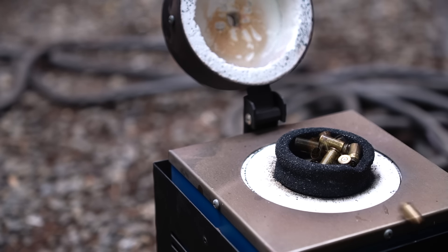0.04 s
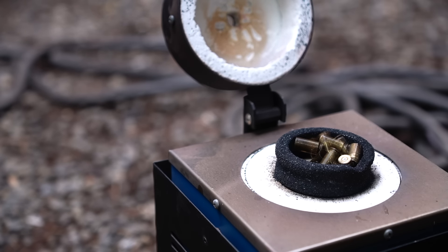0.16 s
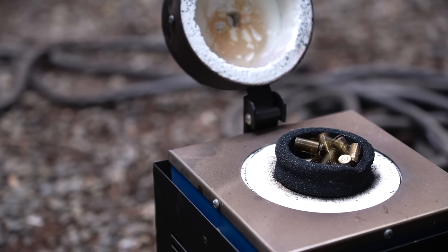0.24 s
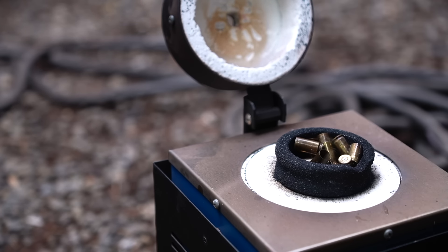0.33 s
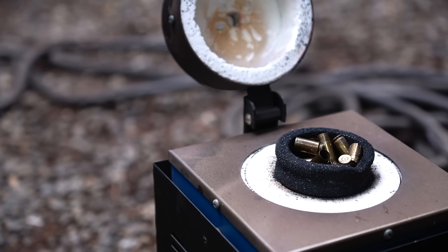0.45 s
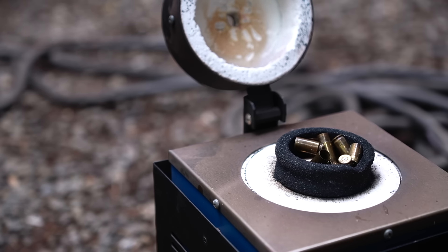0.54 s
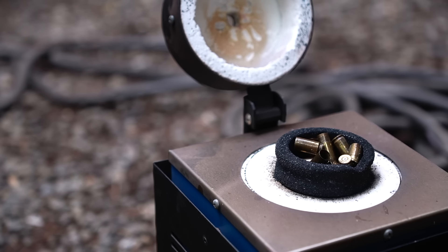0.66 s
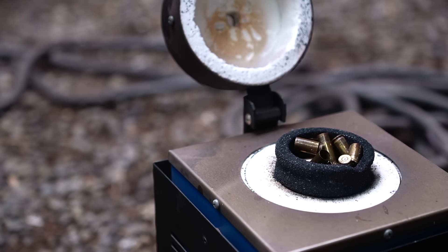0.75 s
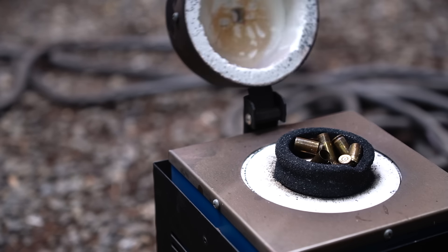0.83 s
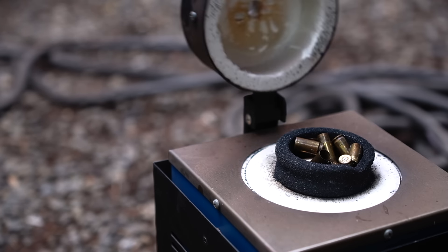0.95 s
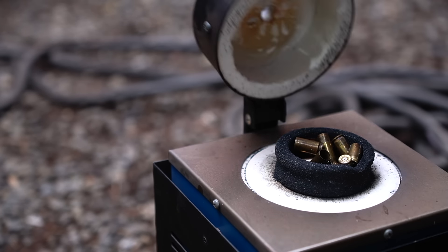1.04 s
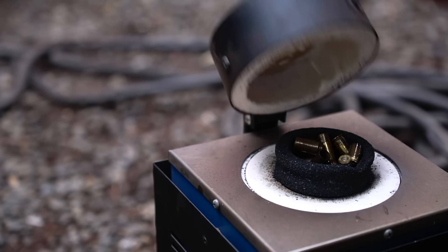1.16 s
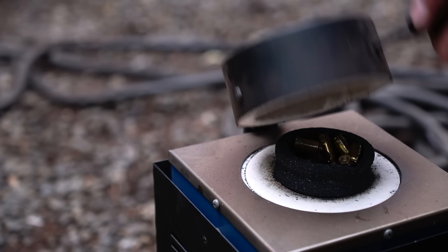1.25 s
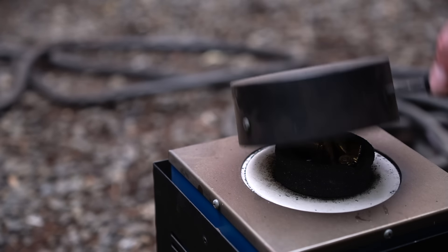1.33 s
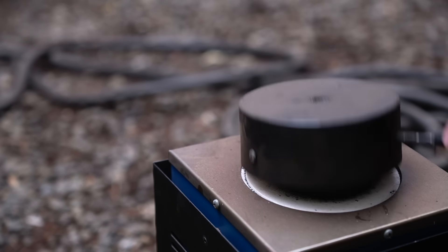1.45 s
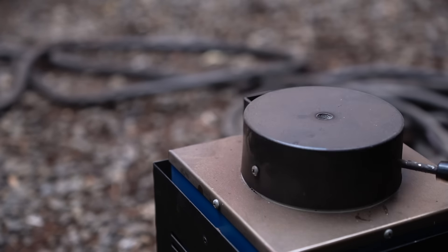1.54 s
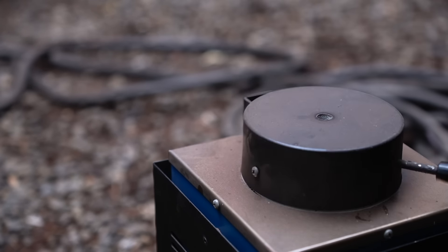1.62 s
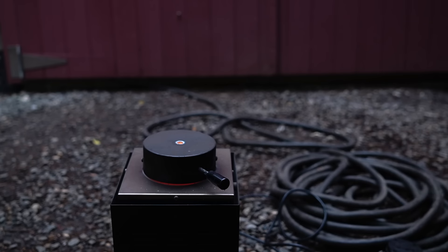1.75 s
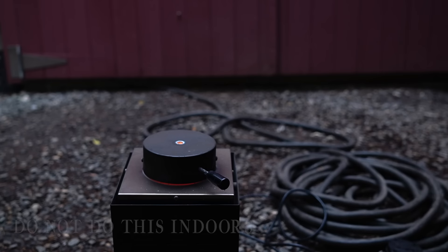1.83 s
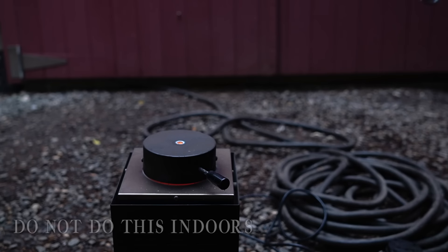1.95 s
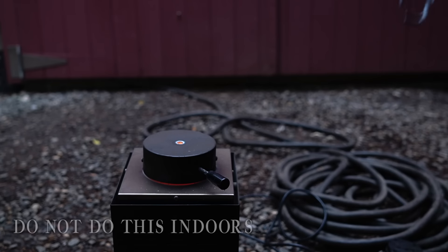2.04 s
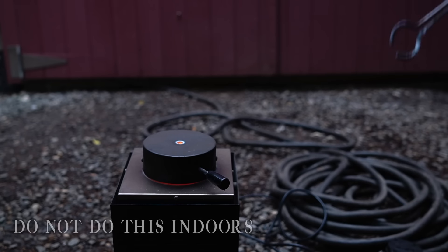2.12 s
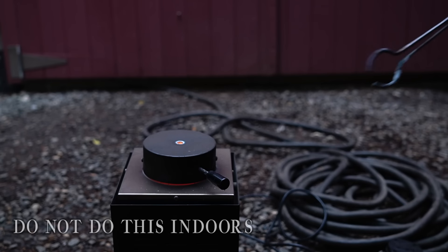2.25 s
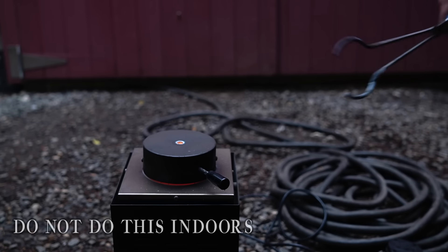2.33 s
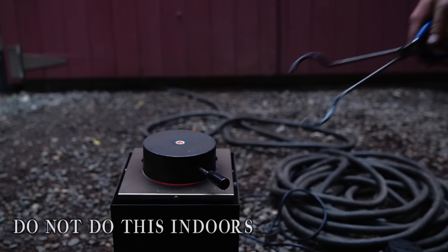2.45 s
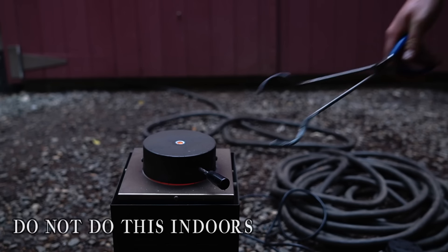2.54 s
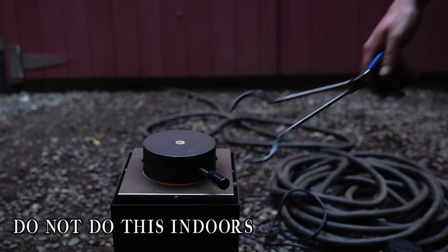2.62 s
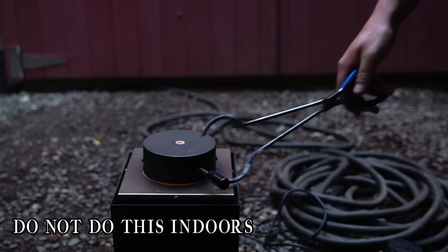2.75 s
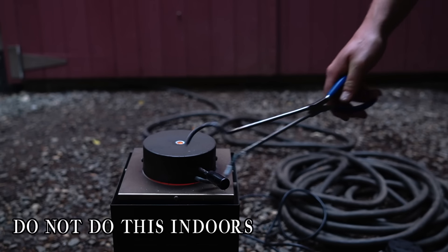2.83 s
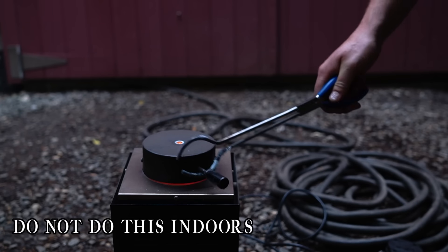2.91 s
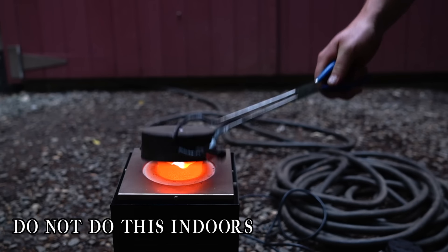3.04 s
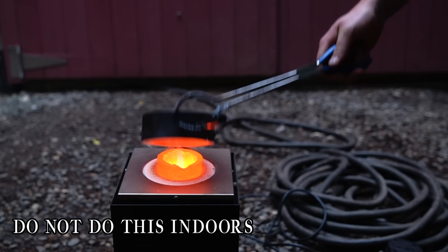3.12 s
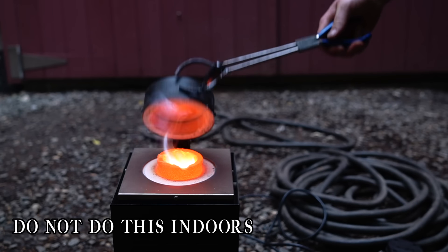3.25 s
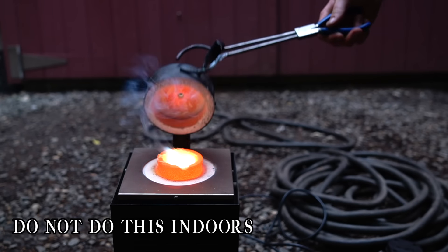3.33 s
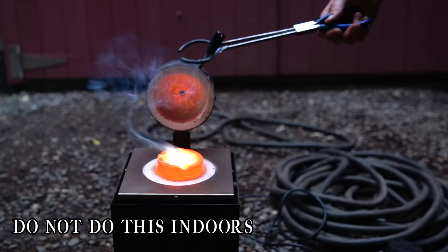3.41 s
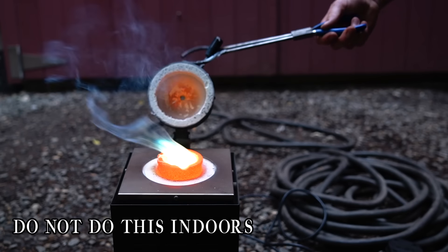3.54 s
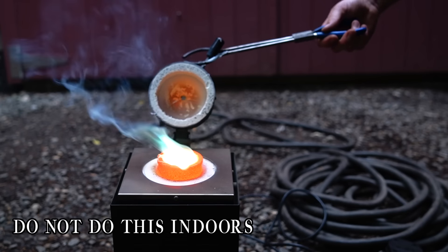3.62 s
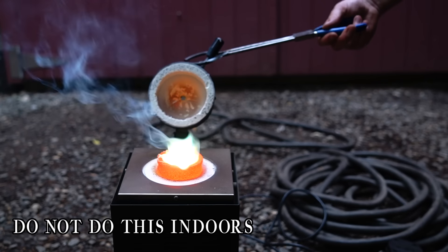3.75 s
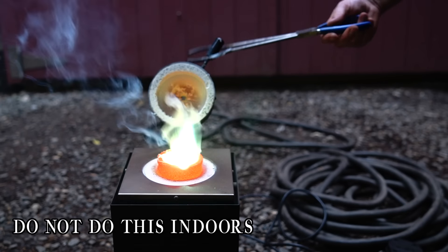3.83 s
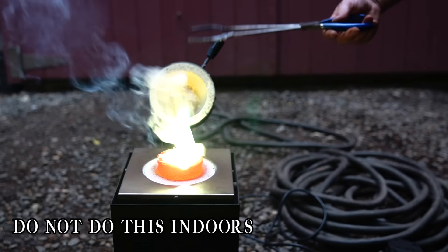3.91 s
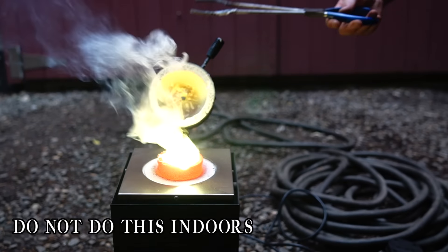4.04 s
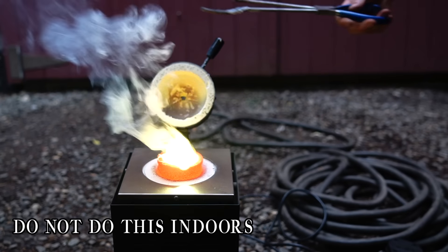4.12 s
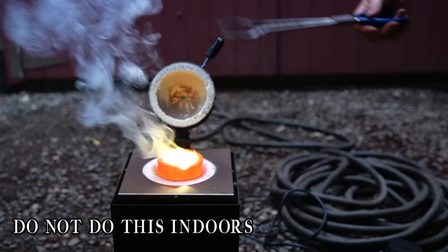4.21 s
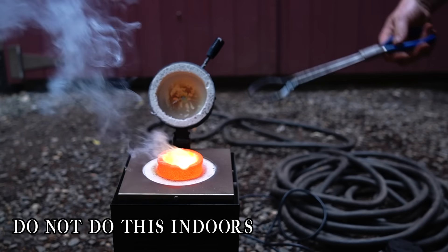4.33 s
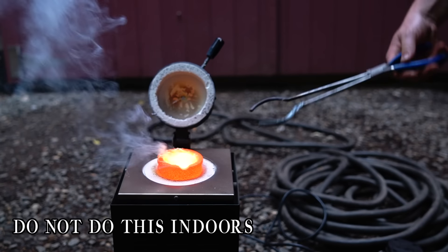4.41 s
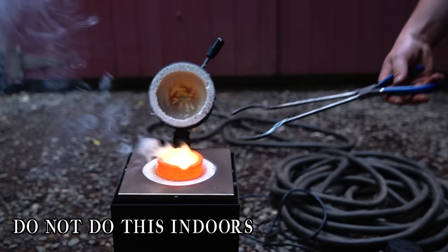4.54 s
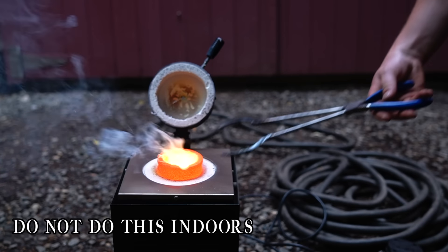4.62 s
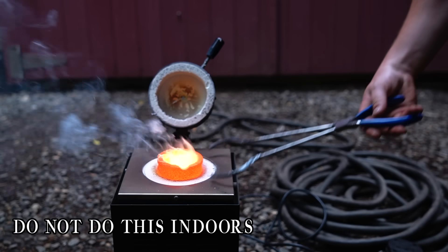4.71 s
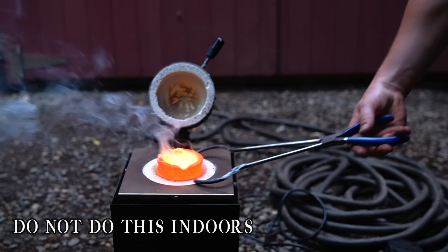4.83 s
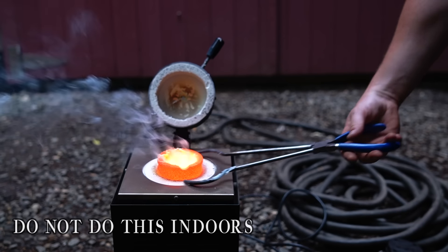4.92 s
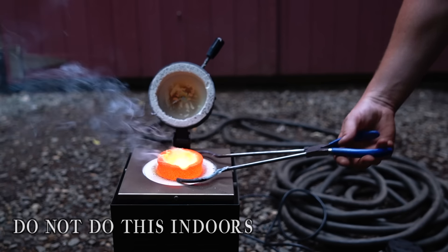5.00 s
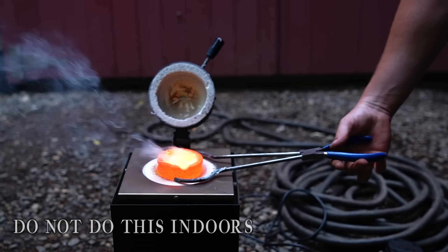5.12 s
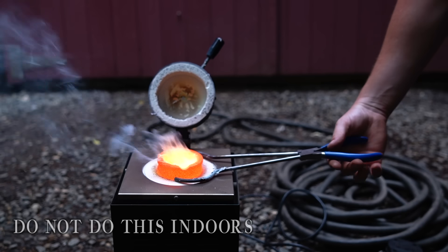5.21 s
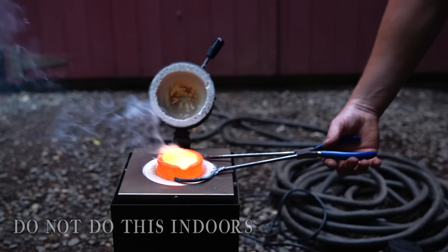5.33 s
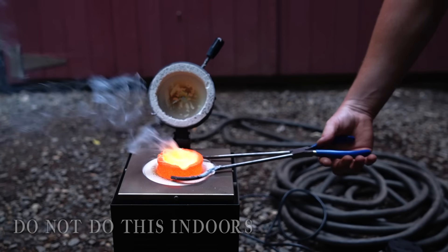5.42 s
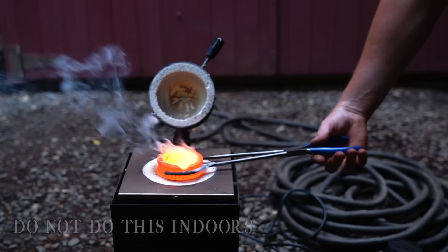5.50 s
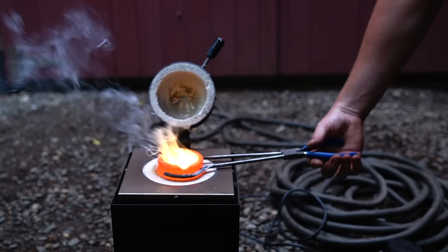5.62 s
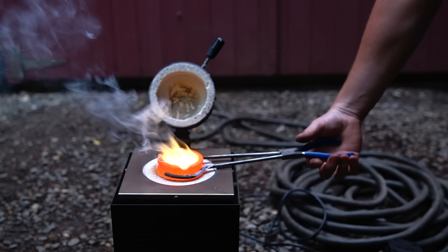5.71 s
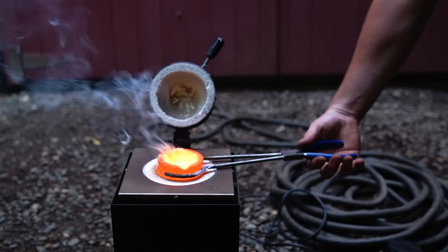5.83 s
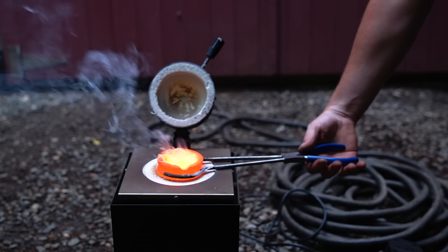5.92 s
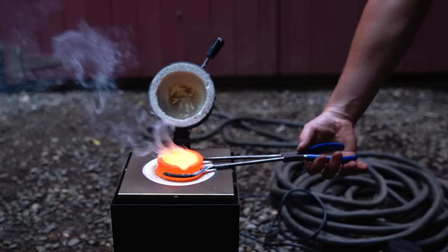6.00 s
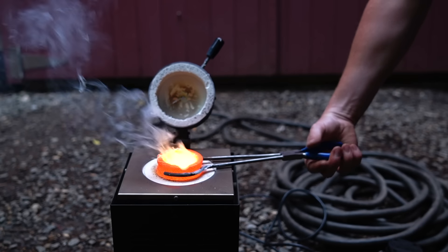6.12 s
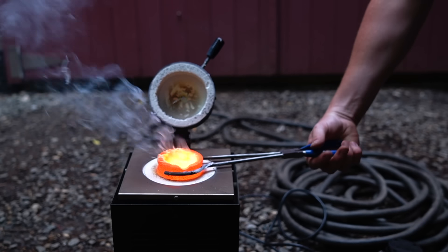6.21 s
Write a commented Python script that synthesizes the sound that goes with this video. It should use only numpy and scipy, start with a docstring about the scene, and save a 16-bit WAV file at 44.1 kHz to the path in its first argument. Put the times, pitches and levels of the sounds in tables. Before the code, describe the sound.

Outdoors, small brass tinkles to rest, a lid drops, gravel crunches faintly, and tongs strike sharply before clacking and scraping on a crucible.

```python
"""A brass casing bounces on the top plate of a small metal furnace outdoors, and the lid drops shut.
Steps crunch on gravel; steel tongs knock the lid open, clack and scrape round the crucible. Struck metal is
noise bursts plus decaying modes; gravel is dense grains, scraping is filtered friction noise. Farther off a
bird whistles gliding tones, insects hiss as a noise band and a motor hums as a wandering sine over low
traffic rumble of filtered noise. One nearly mono microphone."""
import sys
import numpy as np
from scipy import signal
from scipy.fft import rfft, irfft, next_fast_len
from scipy.io import wavfile
from scipy.ndimage import uniform_filter1d

SR = 44100
rng = np.random.default_rng(int(sys.argv[2]) if len(sys.argv) > 2 else 0)


def makeup_ratio(level_db):
    """Linear amplitude ratio for a level in decibels (20 dB per factor of ten)."""
    decades = np.asarray(level_db, float) / 20
    return 10 ** decades


def wrap_up_sound(samples):
    """Save the sound to the file named by the first command line argument, as 16-bit audio."""
    columns = np.atleast_2d(samples).T
    # keep every value between -1 and 1, then stretch to whole-number steps
    tamed = np.clip(columns, -1, 1)
    steps = np.round(tamed * 32767).astype(np.int16)
    wavfile.write(sys.argv[1], SR, steps)


N = 276066
T = np.arange(N) / SR


# the casing's touches on the plate: start_s, mid_db, bass_db, treble_db
CASING_BOUNCES = [(0.0174, -4.5, -22.5, -1), (0.0254, -15, -17, -21), (0.0574, -19.5, -23.5, -28),
                  (0.1129, -10, -25, -12.5), (0.1727, -10, -23, -8)]
# what casing and plate ring with: pitch_hz, relative_db, t60_s (at most 0.6 is used)
PLATE_MODES = [(594, -8, .12), (805, -16.5, 0.51), (945, -4.5, 0.12), (1010, -2.5, 0.17), (1120, 5.5, .14),
               (1447, -17.5, 0.48), (1700, -21, .12), (2056, -21.5, 0.067), (2280, -18.5, 0.087),
               (2160, -24.5, 0.39), (2670, -21.5, 0.21), (2830, -13.5, 0.07), (3256, -2, .19),
               (3366, -3, 0.13), (3640, -6.5, 0.2), (3856, -1, 0.27), (4593, 9.5, 0.13), (4587, -2.5, 0.22),
               (5630, -10, 0.27), (5420, 6, 0.13), (6330, -19.5, 0.23), (7240, 0.5, 0.074),
               (7690, -10, 0.21), (8380, -6.5, 0.15), (8900, -17, 0.14), (10200, -14, 0.1)]


def casing():
    """Brass bouncing on the furnace's top plate: each touch wakes the modes of the metal."""
    return blows(CASING_BOUNCES, PLATE_MODES, fade_s=0.14, ring_db=-4, contact_s=0.0045, first_db=-1,
                 crack_db=-4.5, bass_hz=463, crowd_db=-11.5, crowd_t60=0.21, top_db=-17.5)


# the lid's knocks: start_s, mid_db, bass_db, treble_db
LID_BLOWS = [(1.5635, -13, -8, -20), (1.5804, -22.5, -37, -20), (3.4526, -34.5, -29.5, -39),
             (3.4765, -32.5, -48, -46), (3.4894, -41.5, -31.5, -56), (3.575, -26, -25, -58),
             (3.5877, -36, -30.5, -36.5), (3.6394, -48, -35, -63), (3.8194, -57, -44, -63),
             (3.8655, -49, -37, -58), (3.89, -35.5, -39, -48)]
# what the lid rings with: pitch_hz, relative_db, t60_s (at most 0.6 is used)
LID_MODES = [(279, -16, 0.6), (383, 0.5, 0.28), (499, -8.5, 0.11), (570, -21, 0.51), (664, -1, 0.04),
             (752, -13, 0.28), (830, 3.5, 0.019), (1133, -6, 0.19), (1801, 9, 0.066), (2180, 6.5, 0.059),
             (2350, -6.5, 0.23), (2990, -17, 0.18), (8000, -13, 0.29)]


def lid():
    """The lid: a sharp crack, a long rattling contact and modes that are strongest below 2.5 kHz."""
    return blows(LID_BLOWS, LID_MODES, fade_s=0.4, ring_db=0, contact_s=0.024, crack_db=10,
                 bass_hz=153, crowd_db=-12.5, crowd_t60=0.23, top_db=-30.5)


# the tongs' knocks: start_s, mid_db, bass_db, treble_db
TONG_BLOWS = [(2.0785, -21.5, -34, -19), (2.1111, -31.5, -46, -37), (2.9284, -7.5, -16, -9),
              (2.9641, -3, -10, -5)]
# what the tongs ring with: pitch_hz, relative_db, t60_s (at most 0.6 is used)
TONG_MODES = [(590, -17, 0.17), (754, 5, 0.04), (1307, 2.5, 0.095), (2500, -15.5, 0.22), (2880, -16.5, 0.5),
              (2895, 11, 0.043), (2947, -1.5, 0.28), (3150, -5.5, 0.2), (3290, 0.5, 0.08),
              (4340, -34, 0.079), (5030, 14, 0.041), (5700, -7, 0.072), (7250, -23.5, 0.3),
              (10500, -14, 0.18)]


def tongs():
    """Steel tongs: a sharp crack, a brief contact and bright modes."""
    return blows(TONG_BLOWS, TONG_MODES, fade_s=0.14, ring_db=-4.5, contact_s=0.0026, crack_db=10,
                 bass_hz=433, crowd_db=-15.5, crowd_t60=0.088, top_db=-2.5)


# the tongs clacking on the crucible: start_s, mid_db, bass_db, treble_db
CRUCIBLE_BLOWS = [(4.782, -6.5, -17.5, -8.5), (4.9794, -28, -32.5, -35), (5.5687, -39.5, -41.5, -39.5),
                  (5.9617, -25, -30, -28.5)]
# what the crucible rings with: pitch_hz, relative_db, t60_s (at most 0.6 is used)
CRUCIBLE_MODES = [(285.8, -0.5, 0.33), (376, 6.5, 0.2), (786, -2.5, 0.24), (1987, -3, 0.16),
                  (2290, -3.5, 0.072), (2564, 1.5, .2), (2840, -10.5, 0.9), (2980, -36, 0.25),
                  (3300, -18, 0.13), (3380, -6, 0.08), (4375, 0.5, 0.16), (4700, 6, 0.13), (5620, 6, 0.08),
                  (6480, 1, 0.13), (7270, -9, 0.12), (9440, -13, 0.056), (10000, -27, 0.033)]


def crucible():
    """The crucible knocked by the jaws: a soft crack and modes from low to high."""
    return blows(CRUCIBLE_BLOWS, CRUCIBLE_MODES, fade_s=.18, ring_db=-5, contact_s=0.0054, crack_db=-3.5,
                 bass_hz=270, crowd_db=-6, crowd_t60=0.13, top_db=-16)


# spectrum of the jaws rubbing: pitch_hz, relative_db
RUB_SPECTRUM = [(710, -53), (1200, -30), (1930, -9), (3950, -18.5), (4500, -21), (8170, -20), (9510, -16),
                (16000, -28)]
# bands in which the jaws squeal: centre_hz, width_hz, relative_db
JAW_BANDS = [(2480, 45, -2), (3080, 35, -15), (4900, 44, -11), (6020, 34, -8), (6990, 110, -13),
             (7530, 78, -8), (8420, 69, -14), (9610, 36, -14), (9990, 86, -12), (11600, 69, -19),
             (12400, 67, -21)]
# jaws sliding on the crucible: full_level_s, held_s, level_db, rumble_over_hiss_db
SLIDE_STROKES = [(4.811, .18, -41.5, -3.5), (5.44, 0.089, -64.5, 12.5)]
# jaws squealing while squeezed: full_level_s, held_s, level_db
JAW_SQUEALS = [(5.241, .13, -63.5), (5.44, .105, -53)]


def slide():
    """Rough steel on rough graphite: uneven friction hisses, rings the crucible, grinds and squeals."""
    friction = rng.standard_normal(N) * makeup_ratio(2.2 * walk(150))
    rub = unit(colour(friction, RUB_SPECTRUM))
    t = T[:SR // 4]
    modes = np.r_[ringing(CRUCIBLE_MODES, t), crowd_of(t, db=-6, t60=.16, top_db=-12)]
    rung = 0
    # the contact point travels, so other modes answer from moment to moment
    for _ in range(3):
        push = rub * makeup_ratio(4.0 * walk(25))
        answer = makeup_ratio(6.0 * rng.standard_normal(len(modes))) @ modes
        rung = rung + unit(signal.fftconvolve(push, answer)[:N])
    hiss = rub + makeup_ratio(5) * unit(rung)
    hiss = hiss / np.std(band(hiss, 4200, 13700))
    grind = unit(band(friction, 150, 1100))
    squeal = 0
    for hz, width_hz, db in JAW_BANDS:
        squeal = squeal + makeup_ratio(db) * unit(band(friction, hz - width_hz / 2, hz + width_hz / 2))
    squeal = squeal * makeup_ratio(1.0 * walk(40))  # the grip slips in fits
    out = np.zeros(N)
    for row in JAW_SQUEALS:
        out += swell(*row, rise_db_s=245, fall_db_s=400) * squeal
    for s, held_s, db, rumble_db in SLIDE_STROKES:
        out += swell(s, held_s, db, rise_db_s=182, fall_db_s=176) * (hiss + makeup_ratio(rumble_db) * grind)
    touching = T > CRUCIBLE_BLOWS[0][0]
    return touching * out


# small dry ticks of grit and steel: start_s, level_db, pitch_hz
GRIT_TICKS = [(0.3425, -27.5, 7260), (.8078, -44.5, 850), (1.7696, -44, 700), (1.8383, -34.5, 790),
              (2.022, -44, 2500), (2.036, -40, 4800), (2.042, -39.5, 1220), (2.064, -40, 5000),
              (2.2911, -17.5, 714), (2.4906, -43.5, 1550), (2.717, -47, 4930), (2.882, -35, 4300),
              (3.623, -48, 6100), (3.677, -40.5, 5560), (3.7351, -26.5, 1950), (5.2954, -45, 6030),
              (5.6323, -46, 2500), (5.678, -45.5, 3300), (5.758, -38, 790), (5.853, -47.5, 1030),
              (6.0705, -44, 1470), (6.1207, -45.5, 4580), (6.2068, -46, 5000)]


def ticks():
    """Each tick: a few dying cycles at its pitch in a wide puff of noise."""
    out, t = np.zeros(N + SR), T[:SR // 20]
    for s, db, hz in GRIT_TICKS:
        puff = band(rng.standard_normal(len(t)), hz / 4, hz * 3)
        fade_s = 1.87 / hz + 0.00086  # to 1/e: some cycles plus a fixed time
        out[int(s * SR):][:len(t)] += makeup_ratio(db) * (np.sin(2 * np.pi * hz * t) + puff) * np.exp(-t / fade_s)
    return out[:N]


# footfalls on gravel: full_weight_s, held_s, level_db
FOOTFALLS = [(1.15, 0.077, -65.5), (1.76, 0.097, -56), (2.03, 0.047, -48), (2.223, 0.023, -36),
             (2.398, 0.017, -48.5), (2.61, 0.015, -41.5)]


def gravel():
    """Dense short grains of very uneven size as stones shift: a low body and a finer, brighter grit."""
    grains_per_s = np.array([[250], [1000]])
    sizes = makeup_ratio(3.7 * np.minimum(rng.exponential(size=(2, N)), 2.5))
    sizes = sizes * (rng.random((2, N)) < grains_per_s / SR)
    body, grit = [signal.fftconvolve(size, np.exp(-T[:800] / fade_s))[:N] * rng.standard_normal(N)
                  for size, fade_s in zip(sizes, (.003, .0008))]
    crunch = unit(band(body, 220, 1460)) + makeup_ratio(-5.0) * unit(band(grit, 3000, 7700))
    weight = sum(swell(*step, rise_db_s=321, fall_db_s=219.5) for step in FOOTFALLS)
    return weight * crunch


# single stones knocking: start_s, mid_db, bass_db, treble_db
STONE_BLOWS = [(2.1944, -38, -32, -68), (2.2272, -56, -20, -34.5), (2.2683, -48, -21.5, -46),
               (2.4113, -37, -67, -43), (2.5889, -29, -21.5, -46), (2.6294, -37, -34, -58)]


def stones():
    """Stones knock without ringing: only a crack and fading noise."""
    return blows(STONE_BLOWS, [], fade_s=0.24, crack_db=-6, bass_hz=134)


# whistled notes that slide and then hold: start_s, end_after_s, from_hz, to_hz, level_db
BIRD_WHISTLES = [(2.664, 0.038, 2910, 3180, -60), (2.721, 0.1, 2800, 2482, -53),
                 (3.06, 0.086, 3620, 3610, -68.5), (3.215, 0.054, 2625, 2424, -55.5),
                 (3.421, 0.037, 3400, 3380, -62), (3.524, .05, 3150, 2650, -61),
                 (3.732, 0.035, 2290, 2303, -56), (3.817, 0.081, 3500, 3330, -62),
                 (3.925, 0.11, 2830, 2456, -61), (3.918, 0.06, 4070, 4100, -70),
                 (4.062, 0.054, 2450, 3070, -62.5), (4.244, 0.032, 3230, 3290, -67),
                 (4.298, 0.056, 3370, 3780, -67), (4.358, 0.06, 2800, 2440, -62),
                 (4.465, 0.033, 2420, 2720, -60), (4.632, .09, 3430, 3450, -81),
                 (5.07, 0.064, 3450, 3320, -66.5)]
# short notes that arch up and down: start_s, top_hz, level_db
BIRD_ARCHES = [(3.321, 2050, -64), (4.141, 2320, -67.5), (4.549, 2250, -66), (5.399, 2470, -63)]


def bird():
    """Distant whistled notes, fluttering in moving air and smeared by echoes off trees and walls."""
    glide_s, arch_s, arch_dip = .05, .065, .17  # dip: share by which the ends lie under the top
    t = T[:SR // 4]
    notes = np.zeros(N)
    for s, length_s, from_hz, to_hz, db in BIRD_WHISTLES:
        pitch_hz = np.interp(t, [0, min(glide_s, length_s)], [from_hz, to_hz])
        notes += whistle(s, length_s, pitch_hz, db)
    for s, top_hz, db in BIRD_ARCHES:
        pitch_hz = top_hz * (1 - arch_dip * np.minimum(2 * t / arch_s - 1, 1) ** 2)
        notes += whistle(s, arch_s, pitch_hz, db)
    notes = notes * makeup_ratio(1.9 * walk(70))
    t = T[:SR // 2]
    echo = rng.standard_normal(len(t)) * np.exp(-np.log(1000) * t / 0.78)
    return notes + makeup_ratio(-2.5) * signal.fftconvolve(notes, echo / np.linalg.norm(echo))[:N]


# bands of insect hiss: centre_hz, width_hz, early_db, late_db
INSECT_BANDS = [(5550, 900, -68.5, -72)]


def insects():
    """A band of noise with a quick waver in level."""
    late = late_share()
    out = np.zeros(N)
    for hz, width_hz, early_db, late_db in INSECT_BANDS:
        chorus = unit(band(rng.standard_normal(N), hz - width_hz / 2, hz + width_hz / 2))
        out += makeup_ratio(early_db + late * (late_db - early_db) + 1.5 * walk(60)) * chorus
    return out


# the far motor's mean level over time: time_s, level_db
MOTOR_LEVEL = [(1.72, -60), (1.81, -54), (3.5, -52.5), (4.6, -48), (5.1, -57.5), (6.26, -53.5)]


def motor():
    """A far motor's hum: a sine whose pitch and level wander."""
    pitch_hz = 124.4 + 4 * walk(8)
    hum = np.sqrt(2) * makeup_ratio(2.4 * walk(6)) * np.sin(2 * np.pi * np.cumsum(pitch_hz) / SR)
    time_s, level_db = np.transpose(MOTOR_LEVEL)
    return makeup_ratio(np.interp(T, time_s, level_db, -120, -120)) * hum


# spectrum of rumble and air in the first part: pitch_hz, relative_db
EARLY_AIR = [(12, -49), (20, -19.5), (86, -0.5), (251, -16.5), (305, -19.5), (452, -22.5), (506, -24.5),
             (1180, -30), (4050, -44.5), (6000, -43), (7300, -46), (15200, -45.5), (16500, -58)]
# spectrum of rumble and air in the later part: pitch_hz, relative_db
LATE_AIR = [(12, -51), (20, -4.5), (131, -3.5), (273, -17.5), (342, -18.5), (440, -22), (1210, -28.5),
            (2580, -33.5), (4530, -37.5), (5520, -33), (6530, -43.5), (15200, -45.5), (16500, -64)]


def rumble_and_air():
    """Low traffic rumble and air: wavering shaped noise whose tone shifts between two spectra."""
    early, late = [makeup_ratio(db + 1.3 * walk(7.1)) * unit(colour(rng.standard_normal(N), spectrum))
                   for spectrum, db in ((EARLY_AIR, -50), (LATE_AIR, -49))]
    share = late_share()
    return (1 - share) * early + share * late


def late_share():
    """Share of the later background: 0, then 1 after a 10 ms crossfade from 1.6 s."""
    return np.clip((T - 1.6) / .01, 0, 1)


# spectrum of every blow's clatter: pitch_hz, relative_db
CLATTER_SPECTRUM = [(200, 0), (7000, -4), (11000, -12), (16000, -25)]


def blows(rows, modes, crack_db, bass_hz, fade_s, ring_db=0, contact_s=.003, crowd_db=-60, crowd_t60=.1,
          top_db=-12, first_db=3):
    """Each blow: a crack, a fading clatter of noise, and modes set ringing by a short rattling contact."""
    # a harder blow clatters longer and rings more strongly: growth in dB for each dB of strength
    fade_per_db, ring_per_db = 0.4, 0.65
    out, t = np.zeros(N + SR), T[:2 * SR // 5]
    if modes:
        body = np.r_[ringing(modes, t), crowd_of(t, crowd_db, crowd_t60, top_db)]
    for s, mid_db, bass_db, treble_db in rows:
        strength_db = max(mid_db, bass_db, treble_db)
        clatter_s = fade_s * makeup_ratio(fade_per_db * strength_db)
        noise = colour(rng.standard_normal(len(t)), CLATTER_SPECTRUM)
        ring = 0 * t
        if modes:
            contact = rng.standard_normal(SR // 10) * np.exp(-t[:SR // 10] / contact_s)
            contact[0] = makeup_ratio(first_db) * np.linalg.norm(contact)  # the first touch, then the rattle
            contact = contact / np.linalg.norm(contact)
            # every blow lands elsewhere and wakes the modes unevenly
            woken = makeup_ratio(2.5 * rng.standard_normal(len(body))) @ body
            ring = makeup_ratio(ring_db + ring_per_db * strength_db) * signal.fftconvolve(woken, contact)[:len(t)]
        # how hard and where it strikes sets the balance of the three ranges; the treble dies first
        ranges = ((bass_hz, 1200., bass_db, 1.4, 0),
                  (1200., 4500., mid_db, 1.05, 1),
                  (4500., 17000., treble_db, .8, 1))
        for lo_hz, hi_hz, peak_db, last, sharp in ranges:
            fade = np.exp(-np.log(1000) * t / max(clatter_s * last, .01))
            crack = sharp * makeup_ratio(crack_db) * np.exp(-t / 0.0035)
            part = band(noise * (fade + crack) + ring, lo_hz, hi_hz)
            peak = np.sqrt(2 * uniform_filter1d(part ** 2, size=130).max())
            out[int(s * SR):][:len(t)] += makeup_ratio(peak_db) * part / peak
    return out[:N]


def ringing(modes, t):
    """Free decay of a struck thing, one row a mode; each has a close twin, so it beats."""
    hz, db, t60 = np.transpose(modes)[:, :, None]
    detune, phase = rng.standard_normal((2, len(modes), 1))
    twin = np.sin(2 * np.pi * hz * (1 + .008 * detune) * t + phase)
    pair = np.sin(2 * np.pi * hz * t) + makeup_ratio(-4.5) * twin
    return makeup_ratio(db) * pair * np.exp(-np.log(1000) * t / np.minimum(t60, .6))


def crowd_of(t, db, t60, top_db):
    """The dense lesser modes; weaker at both ends of the range, the high ones dying sooner."""
    hz = rng.uniform(700, 15500, size=125)
    level_db = db + top_db * (hz / 15500) ** 2 - 5.0 * np.maximum(np.log2(2800 / hz), 0)
    return ringing(np.c_[hz, level_db, t60 * (3000 / hz) ** .3], t)


def whistle(s, length_s, pitch_hz, db):
    """One soft-edged tone on a pitch track that begins at s."""
    out, t = np.zeros(N), T[:len(pitch_hz)]
    edge = uniform_filter1d(1. * (t > .005) * (t < length_s), size=400)
    tone = np.sqrt(2) * makeup_ratio(db) * np.sin(2 * np.pi * np.cumsum(pitch_hz) / SR)
    out[int(s * SR):][:len(t)] = edge * tone
    return out


def swell(s, held_s, db, rise_db_s, fall_db_s):
    """Gain that climbs to its level, holds, and falls away at steady rates in dB per second."""
    return makeup_ratio(db - rise_db_s * np.maximum(s - T, 0) - fall_db_s * np.maximum(T - s - held_s, 0))


def walk(rate):
    """Random levels held 1 / rate s and slewed; rms 1."""
    k = int(SR / rate)
    held = np.repeat(rng.standard_normal(N // k + 1), k)
    return unit(uniform_filter1d(uniform_filter1d(held, k), k)[:N])


def unit(x):
    """Scales to rms 1."""
    return x / np.sqrt(np.mean(x ** 2) + 1e-30)


def colour(x, points):
    """Filters by (Hz, dB) points joined on a log-frequency axis."""
    hz, db = np.transpose(points)
    size = next_fast_len(len(x))
    log_hz = np.log(np.arange(size // 2 + 1) * SR / size + 1)
    return irfft(rfft(x, size) * makeup_ratio(np.interp(log_hz, np.log(hz), db)), size)[:len(x)]


def band(x, lo_hz, hi_hz):
    """Causal band-pass."""
    sos = signal.butter(2, [lo_hz, min(hi_hz, .45 * SR)], "bandpass", fs=SR, output="sos")
    return signal.sosfilt(sos, x)


def scene():
    """All sources at the microphone, a hair left of centre."""
    furnace = casing() + lid() + tongs() + crucible() + slide() + ticks()
    ground = gravel() + stones()
    distance = bird() + insects() + motor() + rumble_and_air()
    return (furnace + ground + distance) * makeup_ratio([[.11], [-.11]])


def top_cut(x):
    """Nothing passes above the cut-off."""
    return signal.sosfilt(signal.butter(12, 17160, fs=SR, output="sos"), x)


def record(dry):
    """The loudest peaks are rounded off, then the top is cut above 16.2 kHz."""
    rounded = .95 * np.tanh(dry / .95)
    low_pass = signal.ellip(8, .2, 70, 16200, fs=SR, output="sos")
    mix = signal.sosfilt(low_pass, rounded)
    return top_cut(mix)


dry = scene()
out = record(dry)
wrap_up_sound(out)
```